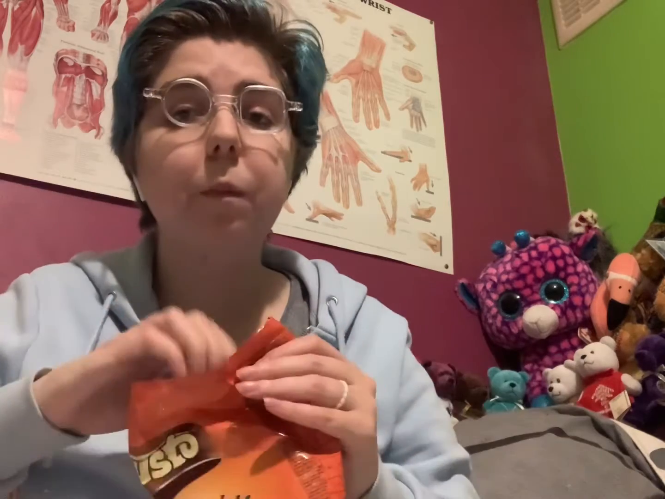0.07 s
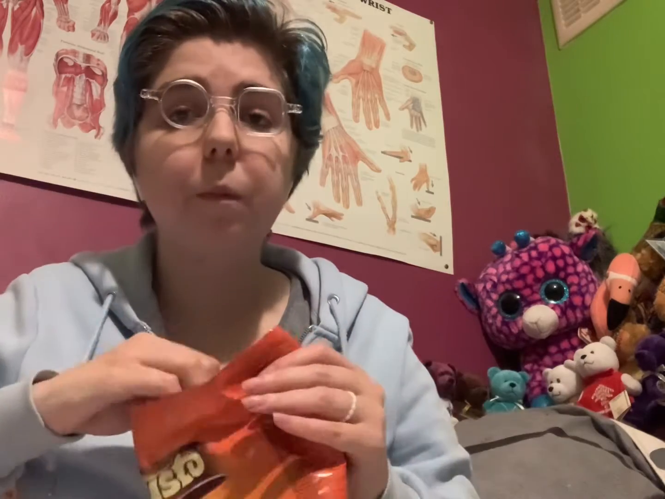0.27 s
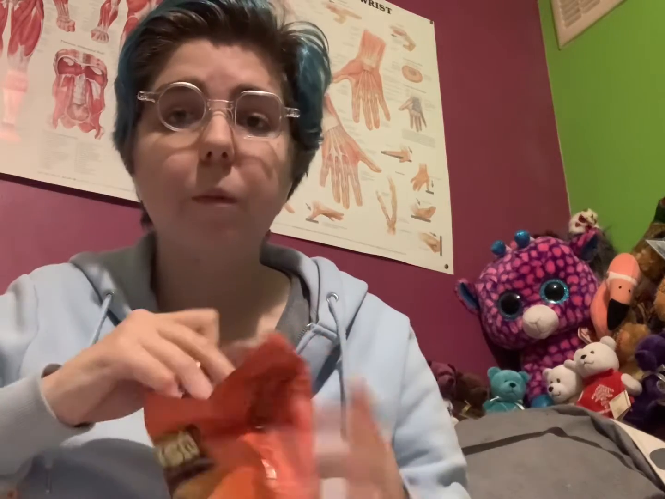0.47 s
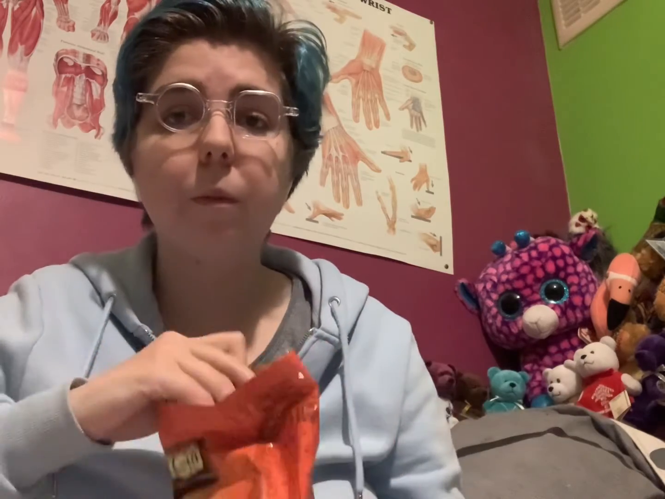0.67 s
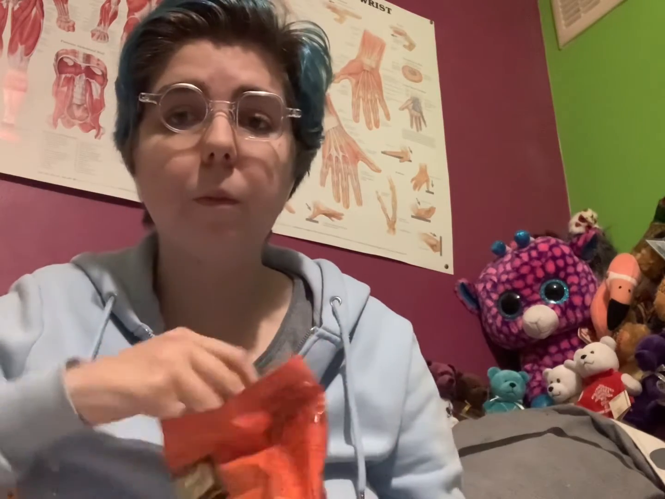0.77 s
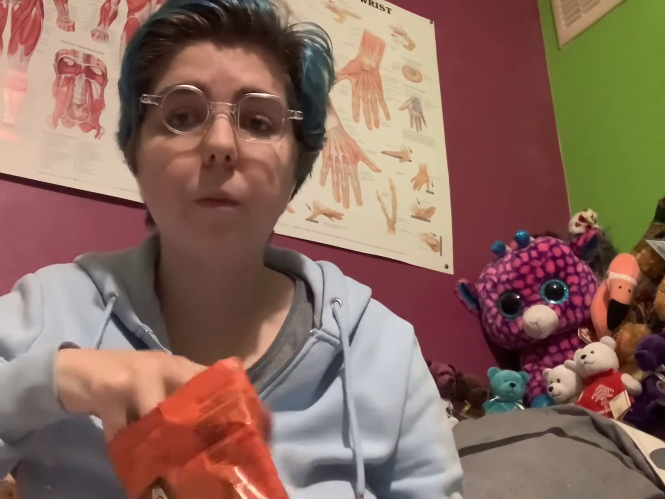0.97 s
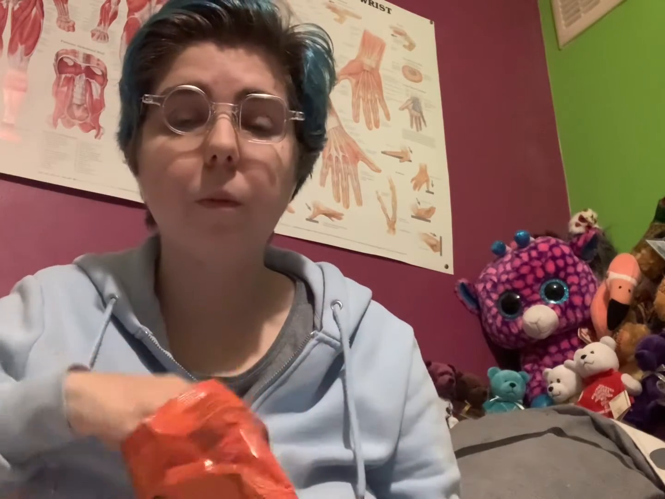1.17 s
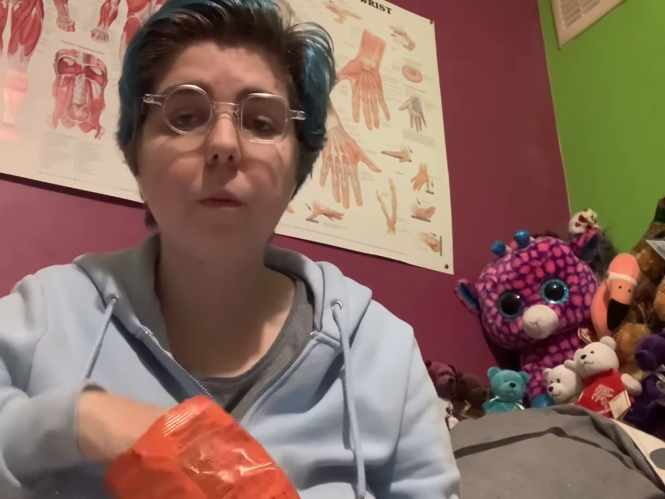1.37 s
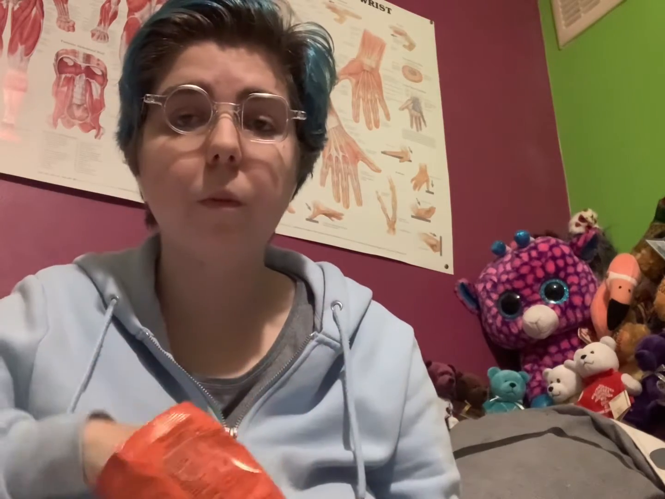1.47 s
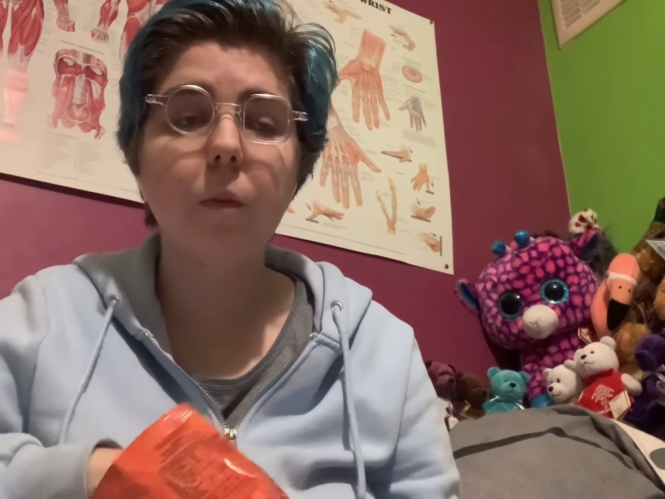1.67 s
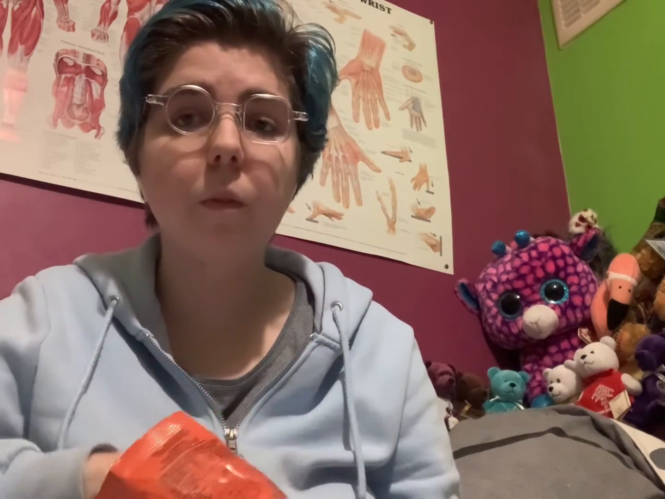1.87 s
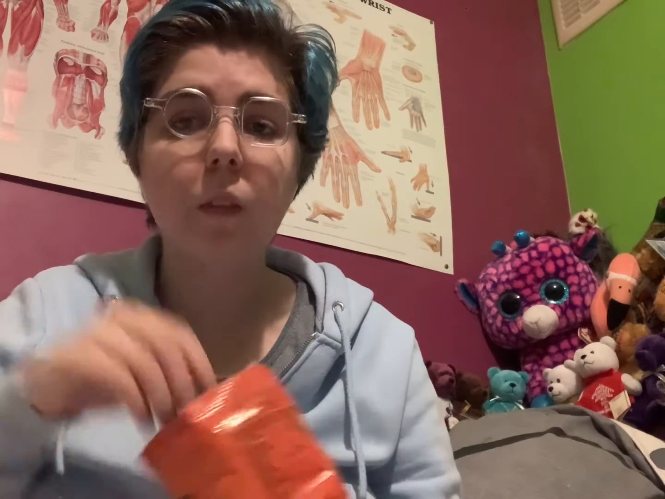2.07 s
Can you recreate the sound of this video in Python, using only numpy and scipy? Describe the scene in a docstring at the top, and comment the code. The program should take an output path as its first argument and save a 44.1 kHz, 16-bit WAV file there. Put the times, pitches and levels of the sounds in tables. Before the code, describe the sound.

A foil crisp packet is rummaged by hand, close in stereo in a soft, quiet room. Irregular bright snaps and fine crackle run from the start to 0.5 s, thin out around 0.6 s, then surge with the sharpest crease near 0.9 s and a dense cluster at 1.2-1.3 s. Faint low handling thuds lie beneath. Scattered crinkles weaken after 1.4 s, nearly silent from 1.8 s, with tiny last ticks near 2.1 s.

```python
"""Hand in a foil packet

A hand rummages in a foil packet close to a pair of microphone ports in a soft room.
Creases buckle as short bursts of foil noise with a bright sheen, over a clumped crackle of small ones.
Damped sines give the low pop of the air in the bag; low noise gives the handling rumble.
Sparse echoes add the room. It all dies down as the hand comes to rest.
"""
import sys
import numpy as np
from scipy import signal
from scipy.fft import rfft, irfft
from scipy.io import wavfile
from scipy.ndimage import uniform_filter1d

SR = 44100
rng = np.random.default_rng(int(sys.argv[2]) if len(sys.argv) > 2 else 0)


def store_pcm(level_fs):
    """Save levels as 16-bit WAV."""
    pcm = np.round(np.clip(level_fs, -1, 1) * 32767).astype(np.int16)
    wavfile.write(sys.argv[1], SR, np.atleast_2d(pcm).T)


def volts_from_db(level):
    """Convert decibel levels to linear amplitude ratios."""
    exponent = np.asarray(level, float) / 20
    return 10 ** exponent


N = 93315

# loud creases: t/s, level/dB, bag pop gain/dB, sheen gain/dB
LOUD_CREASES = [(.0228, -38, -9, -7), (.0373, -26, -40, -23), (.0506, -21.5, -44, 1.5),
                (.0551, -16, -30, -3), (.0923, -23.5, -3.5, -5), (.14, -26.5, -32, -6),
                (.1494, -24, -49, -2.5), (.192, -22, -35, -14), (.2294, -20.5, -12, -3.5),
                (.2573, -23.5, -8.5, -10), (.3107, -22, -10.5, -16.5), (.3398, -22, -6.5, -6.5),
                (.3676, -25, -13, -4), (.3945, -29, -8, -19), (.4188, -20, -9.5, -9),
                (.4285, -16.5, -7, -7), (.4798, -40, -28, -8), (.5012, -18, -15, -24.5),
                (.609, -27.5, -39, -15), (.6244, -31.5, -31, -6), (.637, -32.5, -4.5, -4),
                (.6665, -36.5, 1.5, 3), (.7315, -28, -5.5, -5.5), (.7561, -24, -15, -14),
                (.777, -27, -16, -5), (.8101, -32, -7, -7), (.842, -30, -12, 1), (.8585, -21.5, -25, -3),
                (.9117, -21.5, -2, -5), (.9173, -12, -9, -1), (.969, -22.5, -13, 1),
                (.9744, -21, -12.5, -2), (1.0101, -25, -10, -26), (1.108, -28, -7, -1),
                (1.1345, -25.5, -19, -9), (1.145, -34, -18, -6), (1.159, -35, -0.5, -19),
                (1.175, -18.5, -34, -4), (1.1969, -30.5, -9.5, 11.5), (1.2131, -15.5, -15, -9),
                (1.217, -17, -3, 1.5), (1.2474, -24, -8, 5.5), (1.262, -14.5, -7, -9),
                (1.2995, -29, -5, -6), (1.3205, -16.5, -27, -18.5), (1.3652, -22, -6.5, -5.5),
                (1.3962, -26.5, -6, -10.5), (1.4351, -30, 0, -10), (1.506, -30.5, -7, -12.5),
                (1.5869, -27, -8.5, -5.5), (1.6101, -23, -27, -6.5), (1.6532, -21, -16.5, -13.5),
                (1.71, -35, -7, -7), (1.817, -50.5, 6, -22), (1.8531, -38.5, -17, -23.5),
                (1.953, -41, -7, 3), (2.0378, -45, -42, -18), (2.0725, -44, -43, -10),
                (2.0975, -43, -27, 0), (2.105, -36, -29, -8)]
# effort of the hand: t/s, crackle level/dB
HAND_EFFORT = [(.02, -48), (.057, -40), (.33, -43), (.44, -35.5), (0.483, -46), (0.508, -35), (.549, -46),
               (0.622, -56), (0.651, -42.5), (0.801, -41), (0.919, -30), (1.02, -33.5), (1.06, -43),
               (1.162, -41), (1.21, -25), (1.301, -39), (1.439, -41.5), (1.548, -54.5), (1.574, -39.5),
               (1.672, -44), (1.698, -52.5), (1.92, -68), (2.011, -54.5), (2.059, -66)]
# handling rumble over time: t/s, level/dB
RUMBLE_LEVEL = [(0, -68), (.09, -46), (.21, -65), (.26, -51), (.39, -48.5), (.52, -50.5), (.6, -66),
                (.78, -51), (.93, -48.5), (1.15, -64.5), (1.28, -47), (1.34, -60.5), (1.7, -65.5),
                (2.12, -78)]
# noise spectrum of the foil snap: f/Hz, level/dB
FOIL_SPECTRUM = [(700, -26), (1200, -1), (2400, 0), (3700, -7.5), (5500, -0.5), (7500, -4), (12000, -27)]
# noise spectrum of the bright sheen: f/Hz, level/dB
SHEEN_SPECTRUM = [(6000, -13), (10000, -3), (14500, -13), (16000, -38)]
# noise spectrum of the rumble: f/Hz, level/dB
RUMBLE_SPECTRUM = [(30, -20), (65, 2), (180, 1.5), (420, -23.5)]
# phase between the finished channels: f/Hz, left lead/rad
CHANNEL_PHASE = [(200, -.6), (3000, -.2), (5000, -1.4), (7700, -3.2), (9300, -2.3), (11300, -.1),
                 (13400, .4), (15000, 3)]
# level between the ports: f/Hz, left minus right/dB
PORT_LEAN = [(150, 6), (1200, -.5), (15000, 0)]
# noise power not shared by the ports: f/Hz, share/1
PORT_UNLIKE = [(100, .35), (350, .05), (2800, .12), (4000, .4), (7000, .3), (12000, .05), (14000, .3)]

# crease: rise is a time constant, hue a spectral peak (half width to 1/e of its dB)
SNAP_T60_S, RISE_S, FACET_CUT_HZ = 0.009, 0.0011, 270
HUE_DB, HUE_HALF_WIDTH_OCT = 4.5, 0.34
RING_AT_0_DB_HZ, RING_DB_PER_OCT = 5490, 19  # brighter creases are smaller and strongest higher up
# bag air modes, each retuned per crease by a factor of 0.765 to 1.125
BAG_NOMINAL_HZ, BAG_T60_S, POP_LAG_S = [290, 489, 599, 772], 0.013, 0.0014
# crackle
CRACKLE_PER_S, CRACKLE_KINDS = 600, 48
SPREAD_DB, CLUMP_RMS_DB, CLUMP_S = 0.5, 2, 0.054
GRAIN_MEDIAN_T60_S = 0.0049
CRACKLE_POP_MEAN_DB, CRACKLE_SHEEN_MEAN_DB, TINT_MAX_DB = -16.5, -13.5, 11
# room and band edge
ROOM_DB, ROOM_T60_S = -12, 0.11
EDGE_HZ = 16600


def evened(x):
    """Scales to rms 1."""
    return x / np.sqrt(np.mean(x ** 2) + 1e-20)


def read(points, hz):
    """Looks a table up on a log-frequency axis."""
    f, value = np.transpose(points)
    return np.interp(np.log(hz + 1), np.log(f + 1), value)


def over_time(points):
    """Interpolates a t/s table to every sample."""
    return np.interp(np.arange(N) / SR, *np.transpose(points))


def colour(x, gain):
    """Applies gain(hz) to the spectrum."""
    hz = np.fft.rfftfreq(x.shape[-1], 1 / SR)
    return irfft(rfft(x) * gain(hz), x.shape[-1])


def pair(size, spectrum):
    """Noise of a given spectrum as the two ports hear it: partly shared, partly not; rms 1."""
    unlike = lambda hz: np.clip(read(PORT_UNLIKE, hz), 0, 1)
    noise = rng.standard_normal((3, size))
    shared = colour(noise[0], lambda hz: np.sqrt(1 - unlike(hz)))
    own = colour(noise[1:], lambda hz: np.sqrt(unlike(hz)))
    return evened(colour(shared + own, lambda hz: volts_from_db(read(spectrum, hz))))


def rumble():
    """Low noise of the bag being pushed about."""
    return volts_from_db(over_time(RUMBLE_LEVEL)) * pair(N, RUMBLE_SPECTRUM)


def slow(seconds):
    """Smooth random drift of rms 1: noise averaged twice over the given time."""
    size = max(round(seconds * SR), 1)
    once = uniform_filter1d(rng.standard_normal(N), size)
    return evened(uniform_filter1d(once, size))


def bag_pop(t, pop_db):
    """Bag air answers a crease: decaying sines at its modes, slightly late, random in tuning and phase."""
    late = np.maximum(t - POP_LAG_S, 0)
    modes = np.zeros(len(t))
    for hz in BAG_NOMINAL_HZ:
        tuning, phase = 0.765 + 0.36 * rng.random(), rng.random()
        modes += np.sin(2 * np.pi * (hz * tuning * late + phase))
    return modes * 2 * volts_from_db(pop_db - 60 * late / BAG_T60_S) * (1 - np.exp(-late / POP_LAG_S))


def crease(t60_s, pop_db, sheen_db):
    """One buckling crease: a fast-rising, decaying burst of foil noise, its sheen and the bag's pop."""
    t = np.arange(2048) / SR
    shape = (1 - np.exp(-t / RISE_S)) * volts_from_db(-60 * t / t60_s)
    ring_hz = RING_AT_0_DB_HZ * 2 ** (sheen_db / RING_DB_PER_OCT)

    def hue(hz):
        octaves = np.log2((hz + 1) / ring_hz)
        return volts_from_db(HUE_DB * np.exp(-(octaves / HUE_HALF_WIDTH_OCT) ** 2))

    def burst(spectrum):
        return evened(shape * colour(pair(2048, spectrum), hue)) / evened(shape).max()

    whole = burst(FOIL_SPECTRUM) / 2 + volts_from_db(sheen_db) * burst(SHEEN_SPECTRUM) + bag_pop(t, pop_db)
    return signal.lfilter(*signal.butter(2, FACET_CUT_HZ, "high", fs=SR), whole)


def crackle():
    """Many small creases in clumps, each kind with its own tint and length, scaled by the hand's effort."""
    spread_db = SPREAD_DB * np.minimum(rng.exponential(1, N), 3)
    size = volts_from_db(spread_db + CLUMP_RMS_DB * slow(CLUMP_S))
    size *= rng.random(N) < CRACKLE_PER_S / SR
    kind = rng.integers(0, CRACKLE_KINDS, N)
    out = np.zeros((2, N))
    for k in range(CRACKLE_KINDS):
        length, pop, sheen = rng.uniform(-1, 1, 3)
        pop_db = CRACKLE_POP_MEAN_DB + TINT_MAX_DB * pop
        sheen_db = CRACKLE_SHEEN_MEAN_DB + TINT_MAX_DB * sheen
        grain = crease(GRAIN_MEDIAN_T60_S * 2 ** length, pop_db, sheen_db)
        out += signal.oaconvolve(size[None] * (kind == k), grain, axes=1)[:, :N]
    return volts_from_db(over_time(HAND_EFFORT)) * evened(out)


def snaps():
    """Loud creases, each buckling at its own time."""
    out = np.zeros((2, N + 2048))
    for t_s, level_db, pop_db, sheen_db in LOUD_CREASES:
        start = round(t_s * SR)
        out[:, start:start + 2048] += volts_from_db(level_db) * crease(SNAP_T60_S, pop_db, sheen_db)
    return out[:, :N]


def room(x):
    """Sparse echoes of random sign that die away, other ones per channel, energy 1."""
    size = SR // 5
    t = np.arange(size) / SR
    taps = rng.choice([-1., 1.], (2, size)) * (rng.random((2, size)) < 0.08)
    taps *= volts_from_db(-60 * t / ROOM_T60_S) * (t > 0.003)
    taps /= np.linalg.norm(taps, axis=1, keepdims=True)
    return signal.fftconvolve(x, taps, axes=1)[:, :N]


def scene():
    """The packet and the soft room around it."""
    packet = rumble() + crackle() + snaps()
    return packet + volts_from_db(ROOM_DB) * room(packet)


def band_limit(x):
    """A steep low-pass at the top of the band."""
    return signal.sosfilt(signal.butter(12, 16640, fs=SR, output="sos"), x)


def record(dry):
    """Port levels differ; the finished channels also differ in phase and stop at the band edge."""
    side = np.array([[0.5], [-0.5]])  # left, right

    def channel_gain(hz):
        level = volts_from_db(side * read(PORT_LEAN, hz))
        phase = np.exp(1j * side * read(CHANNEL_PHASE, hz))
        return level * phase * (hz < EDGE_HZ)

    mix = colour(dry, channel_gain)
    return band_limit(mix)


dry = scene()
out = record(dry)
store_pcm(out)
```